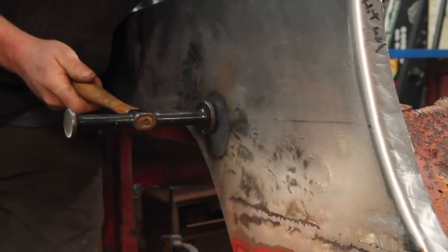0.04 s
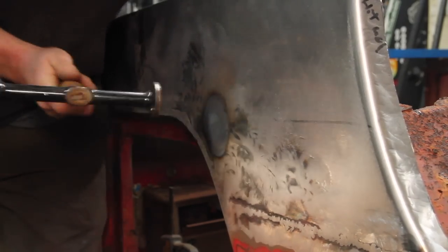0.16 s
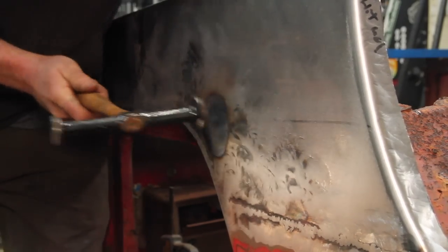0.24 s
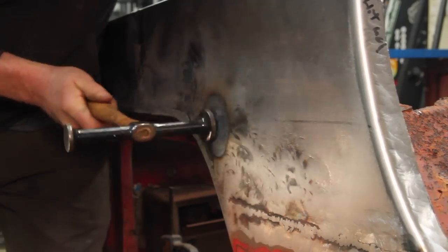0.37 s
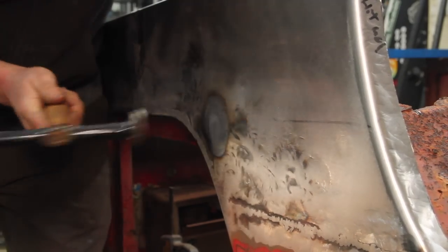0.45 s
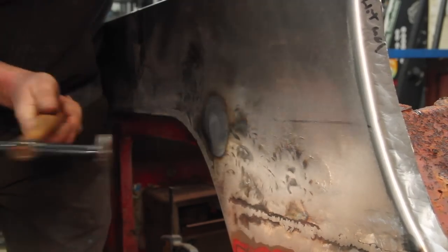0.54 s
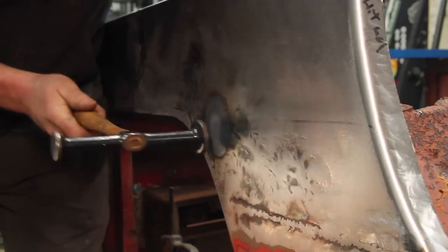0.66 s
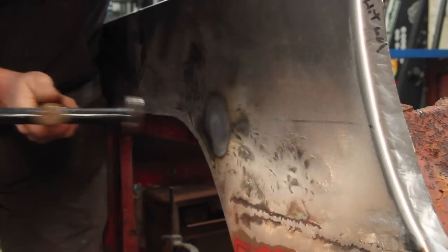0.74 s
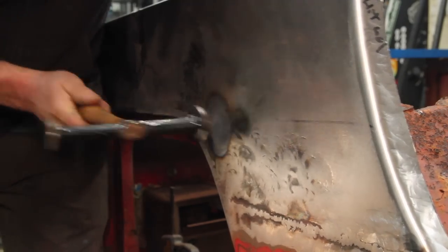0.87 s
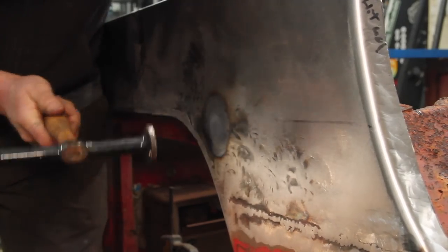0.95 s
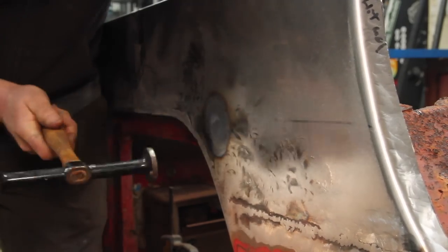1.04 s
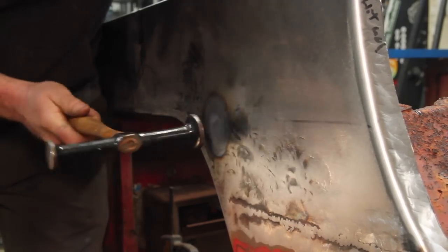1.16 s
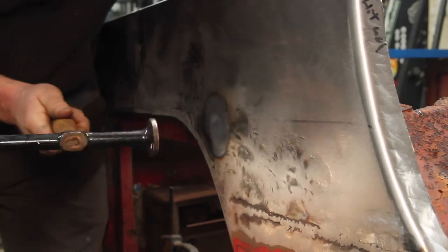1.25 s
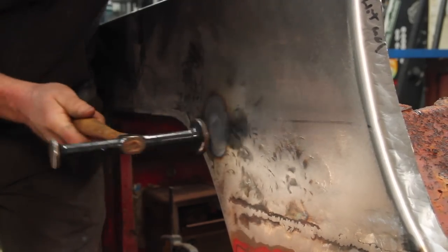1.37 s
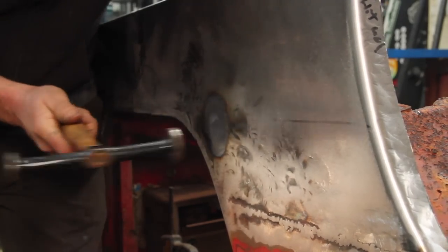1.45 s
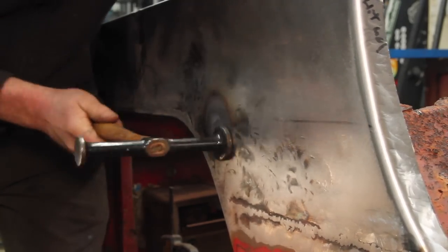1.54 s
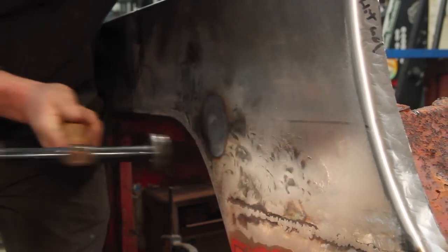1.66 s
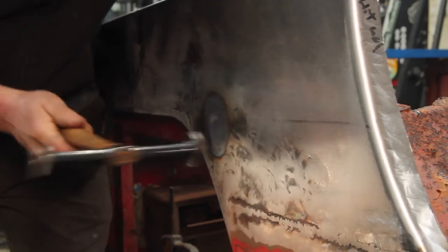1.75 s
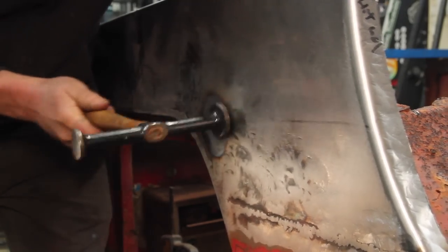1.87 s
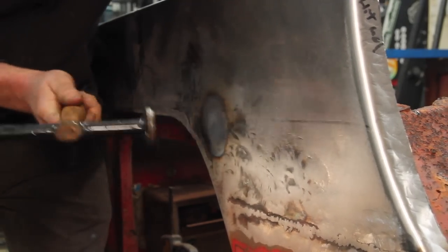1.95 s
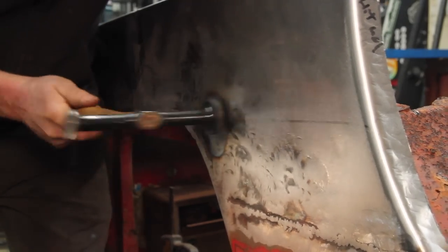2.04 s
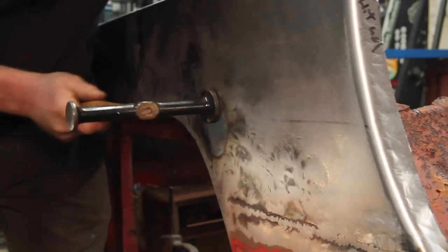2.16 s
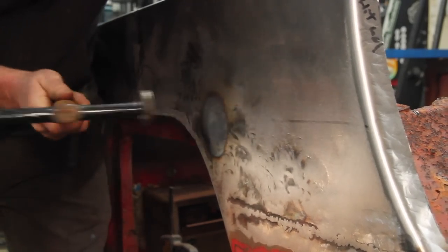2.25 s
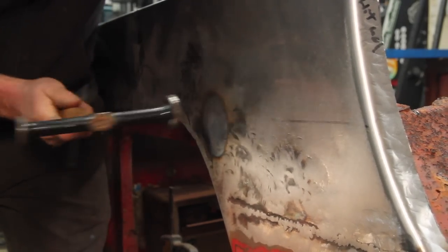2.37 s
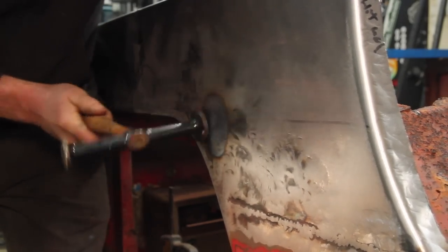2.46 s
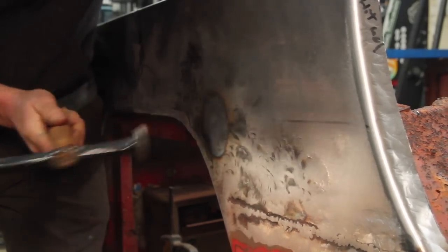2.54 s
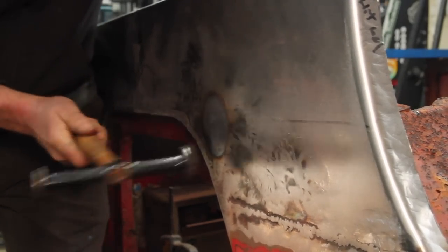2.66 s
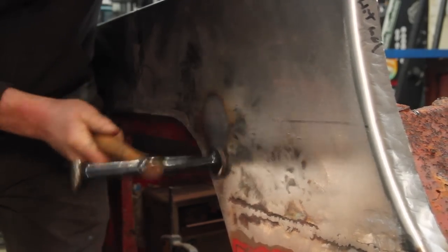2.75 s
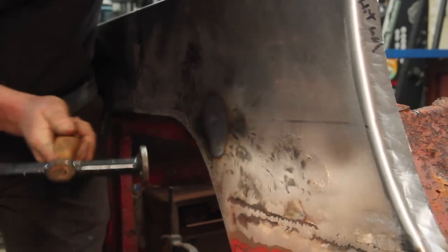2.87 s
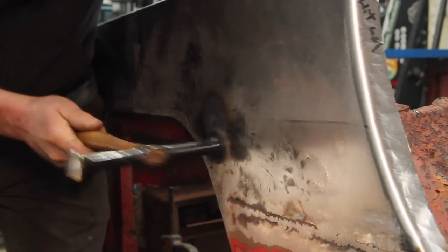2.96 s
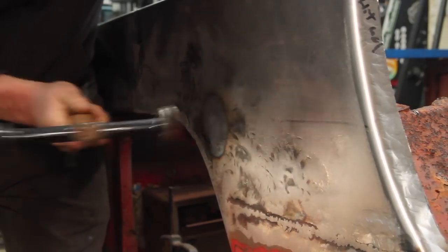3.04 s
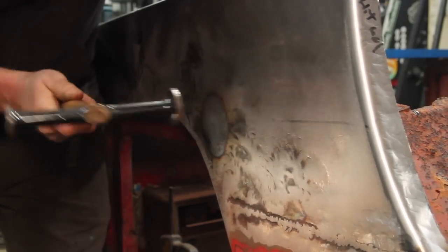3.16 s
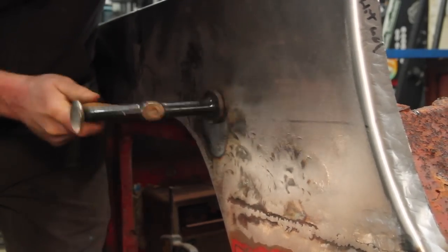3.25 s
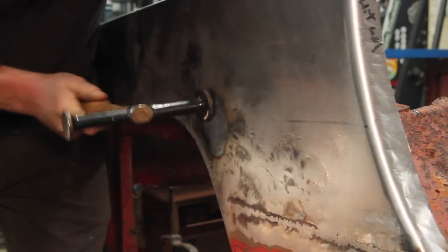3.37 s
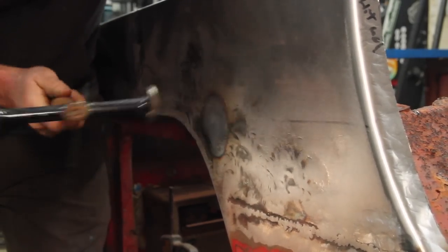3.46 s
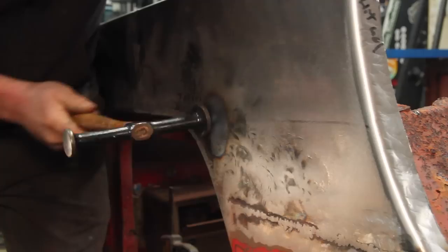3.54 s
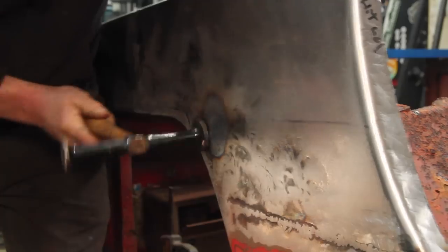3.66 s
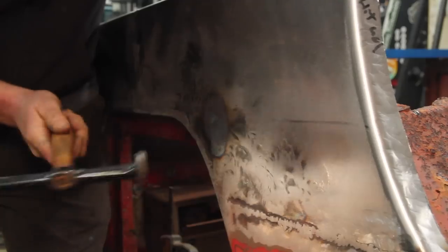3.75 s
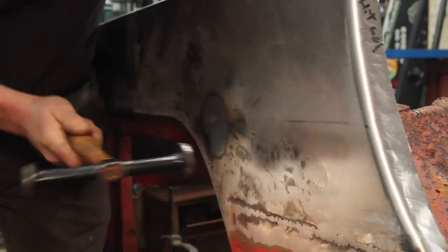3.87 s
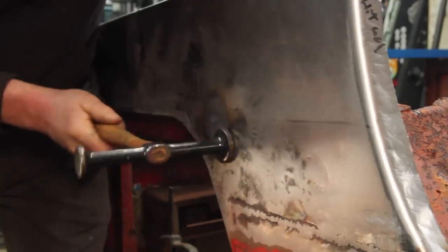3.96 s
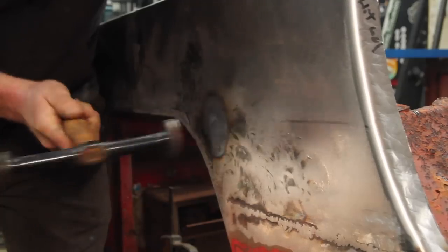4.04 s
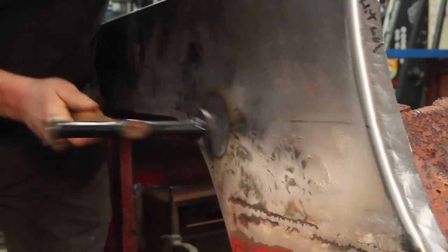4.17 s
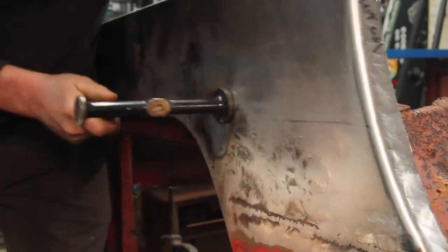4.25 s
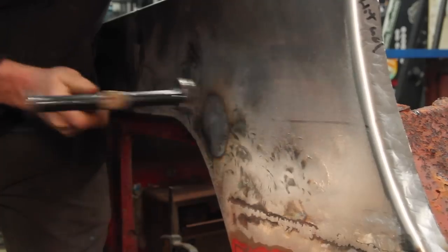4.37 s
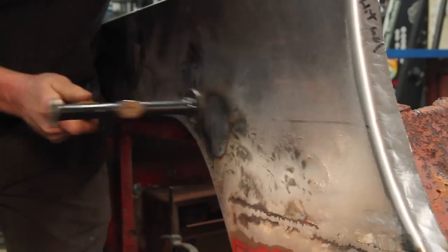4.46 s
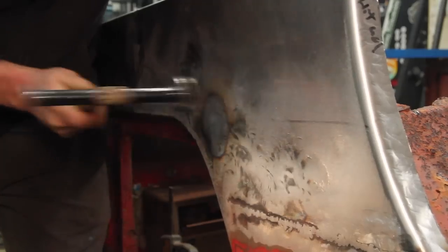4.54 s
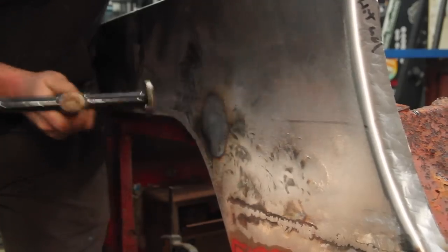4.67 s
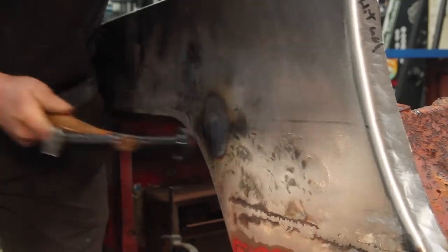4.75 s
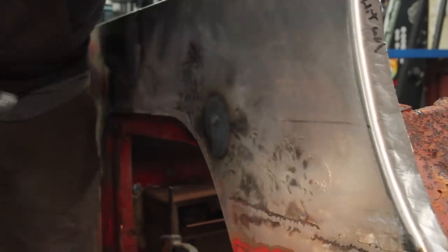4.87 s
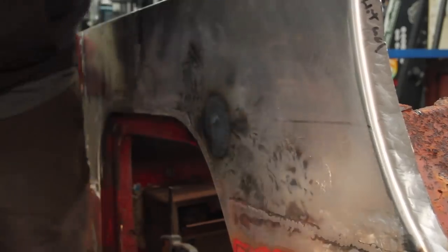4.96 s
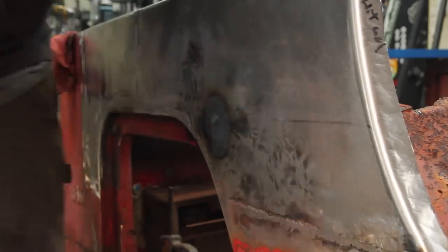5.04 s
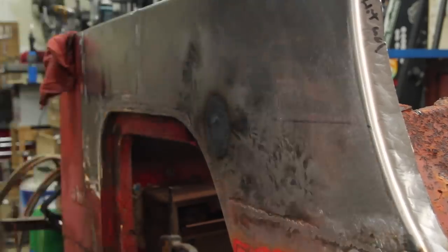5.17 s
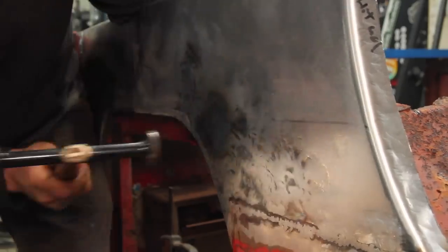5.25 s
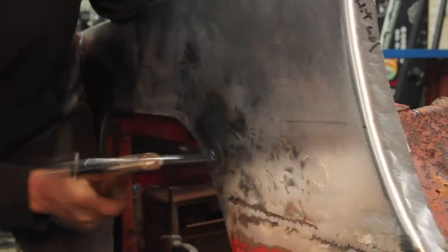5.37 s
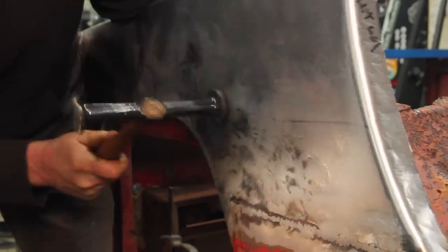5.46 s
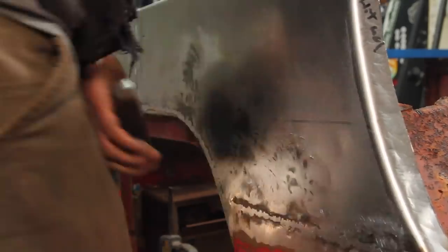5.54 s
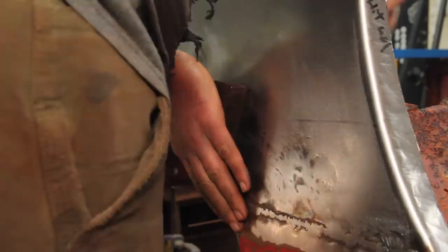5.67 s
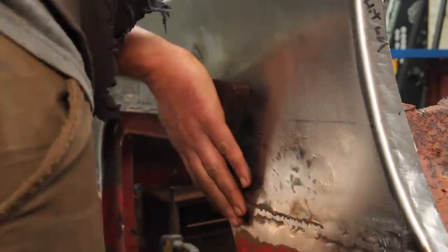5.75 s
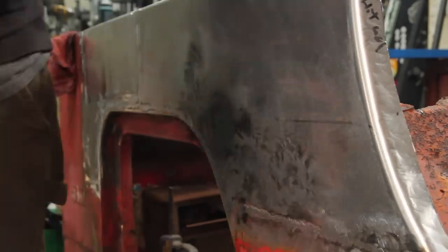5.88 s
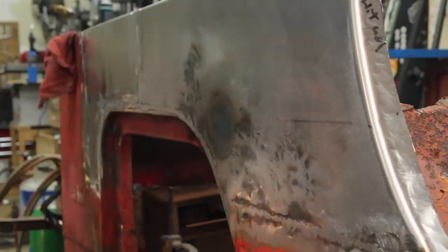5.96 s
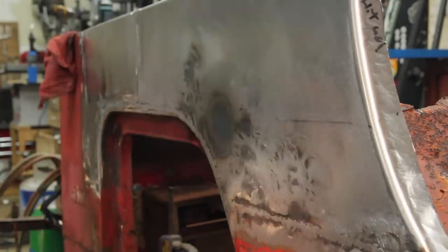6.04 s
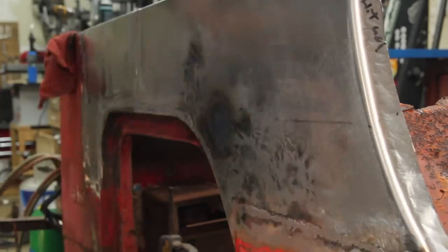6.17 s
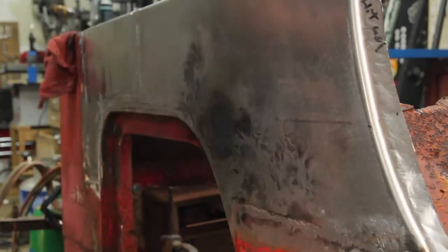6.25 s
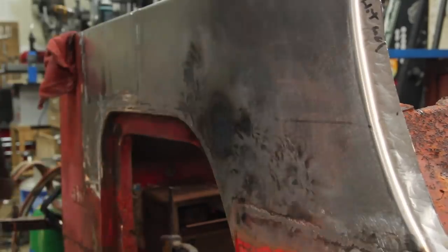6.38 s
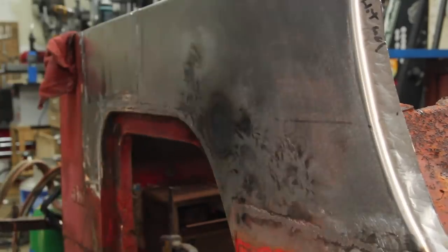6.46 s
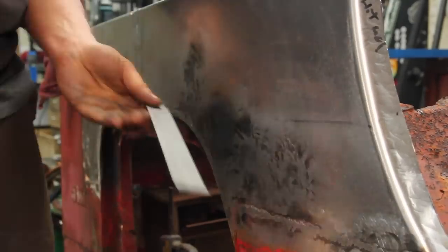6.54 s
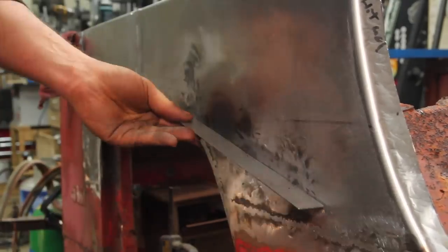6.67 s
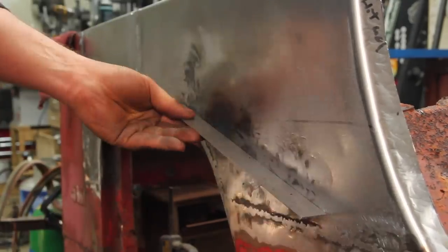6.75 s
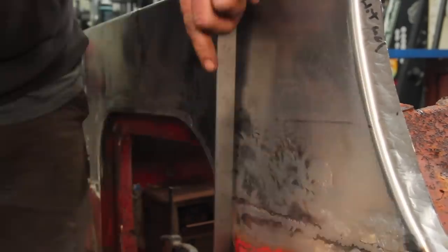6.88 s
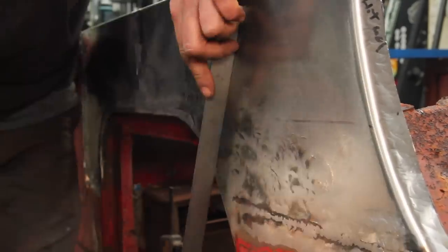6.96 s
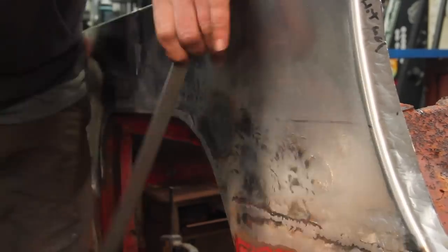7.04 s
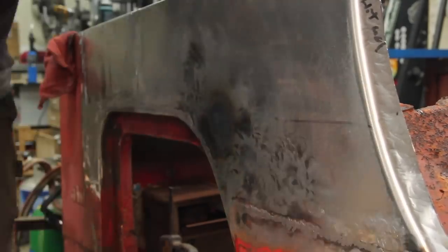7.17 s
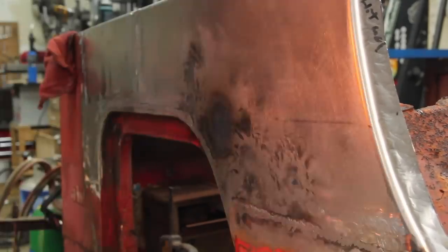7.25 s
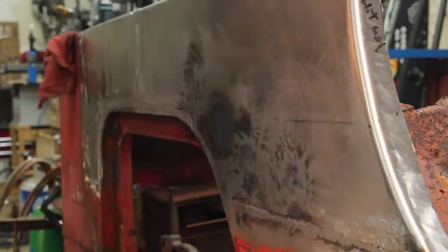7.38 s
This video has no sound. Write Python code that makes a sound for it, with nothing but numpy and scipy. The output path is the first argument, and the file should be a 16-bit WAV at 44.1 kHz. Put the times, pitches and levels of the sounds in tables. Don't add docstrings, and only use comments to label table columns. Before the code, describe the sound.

A quiet workshop with low hum, faint hiss and a distant fan, heard by a close microphone that overloads on the blows. It opens on the decaying tail of an earlier strike. Heavy hammer blows on a large sheet-steel panel land at about 0.25, 0.4 and 0.9 s, crashing densely with a low boom; a hard rebound follows the third at once, then duller bounces, soft thuds and brushing until 1.45 s. From 1.6 to 4.75 s a fast, even run of about twenty-two blows, roughly 0.15 s apart, varies slightly in boom and high hammer-head ring. The last rings away by 5.2 s. Between 5.25 and 5.8 s come abrupt, chopped slices of clangs, some fresh, some only tails. Afterwards it is nearly quiet: short clipped scuffs, rustles and small ticks, a thin high steel ring near 7.15 s, and a faint dull knock near 7.25 s.

```python
import sys
import numpy as np
from scipy import signal
from scipy.fft import rfft, irfft, next_fast_len
from scipy.io import wavfile
from scipy.ndimage import uniform_filter1d

SR = 44100
rng = np.random.default_rng(int(sys.argv[2]) if len(sys.argv) > 2 else 0)


def makeup_ratio(level_db):
    decades = np.asarray(level_db, float) / 20
    return 10 ** decades


def master(y):
    cut = np.clip(np.atleast_2d(y).T, -1, 1)
    pcm = np.round(cut * 32767)
    wavfile.write(sys.argv[1], SR, pcm.astype(np.int16))


N = 326781


def evened(x):
    return x / np.sqrt(np.mean(x ** 2) + 1e-20)


def coloured(shape, source=None):
    size = next_fast_len(N)
    hz = np.fft.rfftfreq(size, 1 / SR)
    if source is None:
        source = rng.standard_normal(N)
    return evened(irfft(rfft(source, size) * shape(np.log(hz + 1)), size)[:N])


def blurred_tone(centre_hz, width):
    return coloured(lambda f: np.exp(-0.5 * ((f - np.log(centre_hz)) / width) ** 2))


def clumped(clump_db):
    _, _, z = signal.stft(rng.standard_normal(N), nperseg=1024)
    clumps = uniform_filter1d(rng.standard_normal(z.shape), size=3, axis=0)
    clumps = uniform_filter1d(clumps, size=5, axis=1)
    return signal.istft(z * makeup_ratio(clump_db * evened(clumps)), nperseg=1024)[1][:N]


def add(mix, s, sound):
    part = mix[..., round(s * SR):][..., :sound.shape[-1]]
    part += sound[..., :part.shape[-1]]


def clock(length_s):
    return np.arange(0, length_s, 1 / SR)


def cut(t, fade=0.0016):
    return np.clip(np.minimum(t - t[0], t[-1] - t) / fade, 0, 1)


def rings(modes, t, extra_db, detune, rise):
    hz, db, t60 = np.transpose(modes)[:, :, None]
    t60 = np.minimum(t60, 0.125 + 150 / hz)
    size, tune, phase = rng.standard_normal((3, len(modes), 1))
    tones = np.sin(2 * np.pi * hz * (1 + detune * tune) * t + 3 * phase) * (1 - np.exp(-t / rise))
    scatter_db = 1.5 * size
    return (makeup_ratio(db + extra_db[:, None] + scatter_db - 60 * t / t60) * tones).sum(0)


# (f/Hz, level/dB per Hz)
ROOM_SPECTRUM = [(18, -22.5), (30, -2.5), (81, -22.5), (129, -26), (331, -12), (572, -25.5), (800, -23),
                 (1300, -27.5), (13400, -47.5), (15300, -56)]
ROOM_DB = -69.5
# (f/Hz, relative width, level/dB rms)
FAN = [(331.3, 0.027, -77.5), (650, .012, -79.5), (1020, .01, -90)]


def shop():
    hz, db = np.transpose(ROOM_SPECTRUM)
    out = makeup_ratio(ROOM_DB) * coloured(lambda f: makeup_ratio(np.interp(f, np.log(hz + 1), db)))
    for tone_hz, width, tone_db in FAN:
        out += makeup_ratio(tone_db) * blurred_tone(tone_hz, width)
    return out


RUSTLE_EDGES = [60, 500, 1800, 5000, 15000]
# (t/s, thud level/dB, scrape level/dB, brightness/dB per band)
BRUSHES = [(0.093, -76, -74.5, -1), (0.168, -76, -75, -10), (0.618, -57, -80, -3), (0.722, -58, -68, -14),
           (0.747, -55, -74, -5), (1.104, -56, -61, -5), (1.18, -44.5, -52, -12), (1.335, -60, -56, -7.5),
           (1.355, -43, -62, -17), (1.431, -51, -74, -6), (4.96, -49.5, -53, -5)]
# (t/s, length/s, thud level/dB, scrape level/dB, brightness/dB per band)
SCUFFS = [(5.239, 0.037, -62, -67.5, -3.5), (5.529, 0.069, -73, -69.5, -4), (5.6, 0.033, -52, -69, -12.5),
          (5.798, 0.026, -62, -66, -2.5), (5.814, 0.032, -59.5, -59.5, -1.5),
          (5.903, 0.049, -71.5, -67.5, 0), (6.103, 0.039, -66, -75.5, -10),
          (6.134, 0.055, -66.5, -76.5, -2), (6.427, 0.0083, -68, -53, -1), (6.437, 0.016, -61, -58.5, 2),
          (6.458, 0.017, -70, -56, -3.5), (6.471, .05, -77, -79, 5), (6.605, 0.055, -62, -70, -9),
          (6.685, 0.095, -68, -70.5, -4.5), (6.821, 0.05, -69, -65, -10.5), (6.908, 0.038, -66, -55, 3),
          (6.945, 0.03, -65, -74, -7), (6.973, 0.051, -61.5, -72, -7), (7.054, 0.039, -65, -63.5, -6.5),
          (7.114, 0.063, -71.5, -66.5, 1), (7.147, 0.054, -81, -69.5, 11.5), (7.25, 0.034, -50.5, -80, -14)]
BRUSH_S, BRUSH_RISE_S, SCRAPE_HUMP_DB = 0.05, 0.013, 5.5


def handling():
    power = np.zeros((4, N))
    events = [(s, BRUSH_S, *rest, True) for s, *rest in BRUSHES]
    events += [(*row, False) for row in SCUFFS]
    for s, length, thud_db, scrape_db, bright_db, whole in events:
        t = clock(length + 0.15 * whole)
        dying_db = -60 * whole * np.maximum(t - 0.35 * length, 0) / 0.18
        shape = cut(t, fade=BRUSH_RISE_S if whole else 0.0025) * makeup_ratio(dying_db)
        side_db = scrape_db - SCRAPE_HUMP_DB
        db = np.array([thud_db, side_db - bright_db, scrape_db, side_db + bright_db])
        add(power, s, (makeup_ratio(db)[:, None] * shape) ** 2)
    source = clumped(clump_db=4.5)
    edges = np.log(RUSTLE_EDGES)
    bands = []
    for lo, hi in zip(edges, edges[1:]):
        corners = [lo - 0.2, lo + 0.1, hi - 0.1, hi + 0.13]
        bands.append(coloured(lambda f: np.interp(f, corners, [0, 0.85, 0.34, 0]), source))
    grit = makeup_ratio(1.1 * evened(uniform_filter1d(rng.standard_normal(N), 150)))
    return (np.sqrt(power) * bands).sum(0) * evened(grit)


# (t/s, f/Hz, level/dB rms, t60/s)
BRACKET = (.42, 2370, -62, 1.3)


def bracket():
    s, hz, db, t60 = BRACKET
    out, t = np.zeros(N), clock(0.3)
    add(out, s, np.sqrt(2) * makeup_ratio(db - 60 * t / t60) * np.sin(2 * np.pi * hz * t) * cut(t, fade=0.02))
    return out


# (t/s, length/s, level/dB)
RULE_LIFT = (7.159, .04, -59)
# (f/Hz, level/dB, t60/s)
RULE_MODES = [(6600, -4, 0.15), (7520, -23, 4.4), (8700, 6.5, 0.11), (9450, 7, 0.11), (10070, 8, 0.16),
              (10460, 1, 0.26), (11000, 6, 0.2), (11420, -14, 0.14), (12000, 2, 0.14), (12840, 5, 0.092),
              (13900, -8, 0.51), (14980, 0, 0.084)]


def rule():
    s, length, db = RULE_LIFT
    out, t = np.zeros(N), clock(length)
    add(out, s, rings(RULE_MODES, t, np.full(len(RULE_MODES), db), detune=0, rise=0.0008) * cut(t))
    return out


# (t/s, peak level/dB, panel boom level/dB)
HEAVY_BLOWS = [
    (0.246, -13.5, -5.5),
    (0.413, -12, -1.5),
    (0.8796, -14, 3.5),
]
# (t/s, peak level/dB, lower head ring level/dB, upper head ring level/dB, panel boom level/dB)
RUN = [(1.5851, -10.5, -8, -7, 2.5), (1.7426, -11, -16.5, -6, -19), (1.8937, -12.5, -7.5, -5.5, -14.5),
       (2.0465, -13, -9.5, -5, 3.5), (2.1958, -14, -9.5, -9, 8), (2.3468, -13.5, -13, -13.5, 3.5),
       (2.4966, -13.5, -15.5, -10, -18.5), (2.6535, -11, -5.5, -20, -3.5), (2.804, -13, 0.5, -3.5, 4.5),
       (2.9616, -12, -5.5, -1.5, -6.5), (3.1146, -13, -4, -14, 3.5), (3.2594, -14, -9.5, -14, 2),
       (3.4083, -13, -13, -12.5, 5.5), (3.5582, -12.5, -5, -10.5, 2), (3.707, -13.5, -5, -4, 5),
       (3.8546, -14.5, -3.5, -3, 4), (4.003, -14, 0.5, -2.5, 4.5), (4.1542, -12.5, -8.5, -4, -4),
       (4.3036, -14, -12.5, -26.5, 5.5), (4.4465, -14.5, -37, -13.5, 1), (4.6101, -14.5, -14.5, -4, 0),
       (4.7482, -12, -13.5, -6, -3)]
# (t/s, strength level/dB, brightness/dB per octave)
BOUNCES = [
    (0.622, -60.5, -2),
    (0.755, -51, -3),
    (0.933, -20.5, -1.4),
    (0.959, -48, 4),
    (0.996, -41, -2.5),
    (1.21, -30, -3),
    (1.383, -52.5, -1),
    (1.438, -53, -1),
]
# (t/s, length/s, age of the blow at the cut/s, strength level/dB, head ring level/dB)
RINGING_SLICES = [
    (5.279, 0.024, 0.12, -11, -15),
    (5.296, 0.04, 0.0097, -14.5, 4),
    (5.336, 0.033, 0.028, -18.5, 2),
    (5.371, 0.022, 0.077, -18.5, -7),
    (5.389, 0.031, 0.012, -12.5, 5),
    (5.414, 0.039, 0.048, -13.5, 2.5),
    (5.454, 0.044, 0.13, -12.5, -19),
    (5.513, 0.025, 0.075, -19, 2),
    (5.668, 0.07, 0.11, -9.5, -6.5),
]
# (t/s, length/s, age of the blow at the cut/s, strength level/dB, brightness/dB per octave)
FLAT_SLICES = [
    (0, .5, 0.11, -27.5, -3.5),
    (3.109, .011, 0.044, -23, 3),
    (5.496, 0.015, 0.0056, -24, -1.4),
    (5.71, 0.0066, 0.00092, -14, 1),
    (5.719, 0.012, 0.085, -24, -3),
    (5.729, 0.027, .008, -15, 3),
    (7.255, .038, .012, -43, -5),
    (5.754, .015, 0.03, -33, 2),
]
FLAT_RING_DB, BOUNCE_RING_DB, PART_BOOM_DB = -30, -34, -4.5
HEAVY_BRIGHTNESS, RUN_BRIGHTNESS, SLICE_BRIGHTNESS = -0.44, 0.24, 2.2
BOUNCE_S, LEAD_S = 0.35, 0.0012


def strikes():
    blows = [(s, db, HEAVY_BRIGHTNESS, FLAT_RING_DB, FLAT_RING_DB, boom_db) for s, db, boom_db in HEAVY_BLOWS]
    blows += [(s, db, RUN_BRIGHTNESS, *rest) for s, db, *rest in RUN]
    heard = np.minimum(np.diff([s for s, *_ in blows], append=np.inf), 0.6)
    out = [(s - LEAD_S, clock(length), *rest) for length, (s, *rest) in zip(heard, blows)]
    parts = [(*row, SLICE_BRIGHTNESS, ring_db) for *row, ring_db in RINGING_SLICES]
    parts += [(*row, FLAT_RING_DB) for row in FLAT_SLICES]
    parts += [(s, BOUNCE_S, 0, db, tilt, BOUNCE_RING_DB) for s, db, tilt in BOUNCES]
    for s, length, age, db, tilt, ring_db in parts:
        out.append((s, age + clock(length), db, tilt, ring_db, ring_db - 3, PART_BOOM_DB))
    return out


# (f/Hz, relative width, level/dB, t60/s)
SHIMMER = [(5236, 0.026, -3, 0.17), (5660, 0.025, -6.5, .16)]


def head_shimmer():
    hz, width, db, t60 = np.transpose(SHIMMER)[:, :, None]
    power = np.zeros((len(SHIMMER), N))
    for s, t, blow_db, _, lower_db, upper_db, _ in strikes():
        ring_db = np.array([[lower_db], [upper_db]])
        add(power, s, (makeup_ratio(blow_db + db + ring_db - 60 * t / t60) * cut(t)) ** 2)
    bands = [blurred_tone(centre, spread) for centre, spread in zip(hz, width)]
    return (np.sqrt(power) * bands).sum(0)


# (f/Hz, level/dB, t60/s)
PANEL = [(139.8, -0.4, 0.18), (195.6, 2, 0.16), (217.6, -8.5, 0.22), (327, -8.5, .25), (372, -1, 0.24),
         (646, -3, 0.2), (718, -1, .22), (798, 3, 0.14), (1002, 1, 0.14), (1186, -3.5, 0.2),
         (1447, -23.5, 0.14), (1640, -19.5, 0.15), (2221, -15.5, 0.3), (2510, -4, 0.3)]
# (f/Hz, level/dB, t60/s)
HEAD = [(5410, -5.5, 0.043), (5060, -0.5, 0.071), (5900, -7, 0.14), (5380, -6.5, 0.051),
        (5900, -8.5, 0.037), (11400, -5.5, 0.039)]
PANEL_DB = -7


def panel_and_head():
    out = np.zeros(N)
    is_boom = np.arange(len(PANEL)) < 3
    for s, t, blow_db, _, lower_db, upper_db, boom_db in strikes():
        panel = rings(PANEL, t, PANEL_DB + boom_db * is_boom, detune=0.016, rise=0.017)
        head = rings(HEAD, t, np.repeat([lower_db, upper_db], 3), detune=0.012, rise=0.003)
        add(out, s, makeup_ratio(blow_db) * (panel + head) * cut(t))
    return out


# (f/Hz, level/dB, rise/s, t60/s, late tail level/dB, late t60/s)
SHEET = [(36, -17.5, 0.012, 0.25, -31, .5), (80, -22, 0.0094, 0.19, -27, 0.35),
         (172, -8.5, 0.02, 0.26, -10, 0.44), (306, -4, 0.014, 0.24, -19.5, 0.26),
         (706, -2.5, 0.0034, 0.16, -26.5, 0.52), (1270, -4, 0.0035, 0.18, -25.5, 0.4),
         (2500, -4, 0.0037, 0.14, -16.5, 0.29), (3840, -7, 0.001, 0.16, -19, 0.31),
         (7440, -12, 0.00025, 0.14, -30.5, 0.14), (11600, -11, 0.0008, .1, -36, 0.2)]
CRACK_DB, CRACK_T60_S = 4.5, 0.01


def sheet():
    hz, db, rise, t60, late_db, late_t60 = np.transpose(SHEET)[:, :, None]
    octaves = np.log2(np.maximum(hz, 400) / 1000)
    power = np.zeros((len(SHEET), N))
    for s, t, blow_db, tilt, *_ in strikes():
        fall = makeup_ratio(-60 * t / t60) ** 2 + makeup_ratio(late_db - 60 * t / late_t60) ** 2
        swell = (1 - np.exp(-t / rise)) ** 4
        crack = hz / 10000 * makeup_ratio(CRACK_DB - 60 * t / CRACK_T60_S) ** 2
        level = makeup_ratio(blow_db + db + tilt * octaves) * cut(t)
        add(power, s, level ** 2 * (fall * swell + crack))
    source = clumped(clump_db=1.55)
    centres = np.log(np.concatenate([[20], hz[:, 0], [19000]]))
    bands = []
    for k in range(len(SHEET)):
        bands.append(coloured(lambda f: np.interp(f, centres[k:k + 3], [0, 1, 0]), source))
    return (np.sqrt(power) * bands).sum(0)


def scene():
    background = shop() + handling() + bracket() + rule()
    return (background + head_shimmer() + panel_and_head() + sheet())[None]


def below(x, hz):
    return signal.oaconvolve(x, signal.firwin(511, hz, window=("kaiser", 9), fs=SR)[None], "same")


def top_cut(x):
    return signal.sosfilt(signal.butter(12, 17050, fs=SR, output="sos"), x)


CEILING, KNEE = 0.16, 4.3
EDGE_HZ, ATTACK_EDGE_HZ, TOP_BAND_DB = 15900, 16950, -12
OFFSET = -0.0002


def record(dry):
    flat = dry / (1 + abs(dry / CEILING) ** KNEE) ** (1 / KNEE)
    flat = signal.lfilter(*signal.butter(2, 80, "high", fs=SR), flat)
    power = abs(uniform_filter1d(flat ** 2, size=400))
    attack = power > 12 * np.roll(power, 400, axis=1) + 1e-5
    body = below(flat, EDGE_HZ)
    top = makeup_ratio(TOP_BAND_DB) * (flat - body) * uniform_filter1d(attack * 1.0, size=128)
    mix = below(body + top, ATTACK_EDGE_HZ) + OFFSET
    return top_cut(mix)


dry = scene()
out = record(dry)
master(out)
```